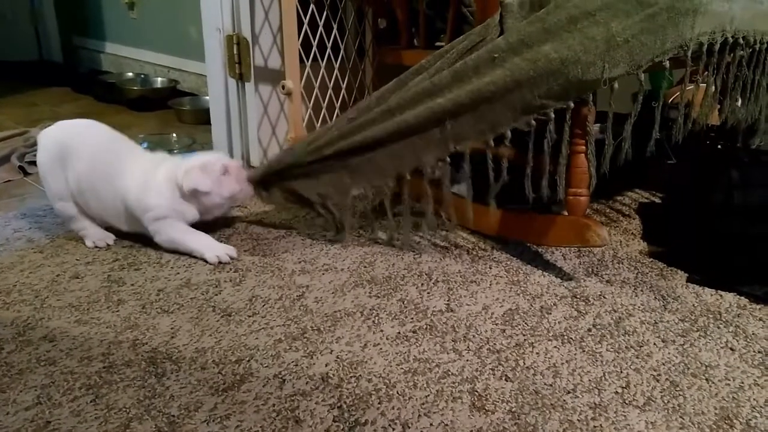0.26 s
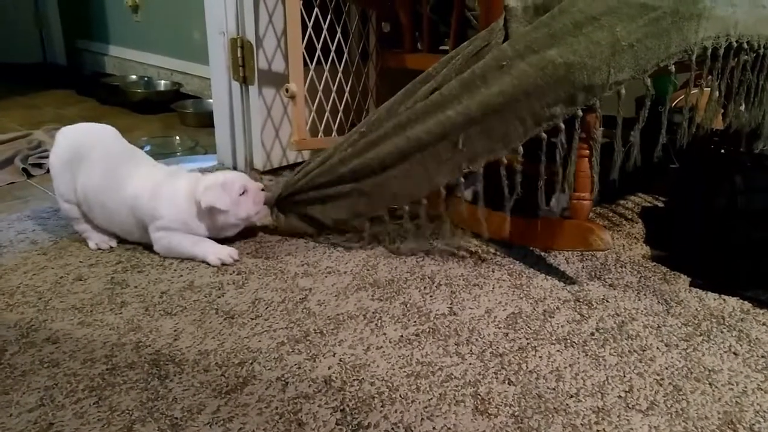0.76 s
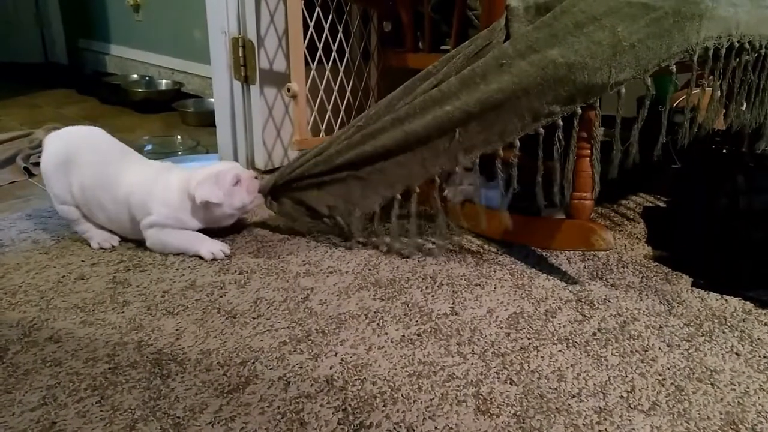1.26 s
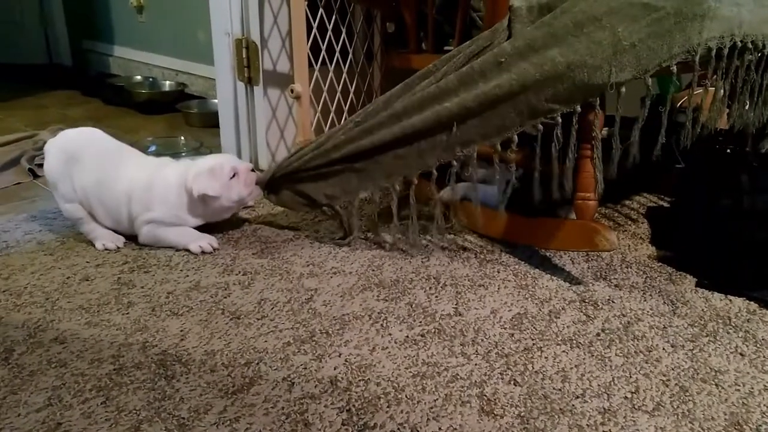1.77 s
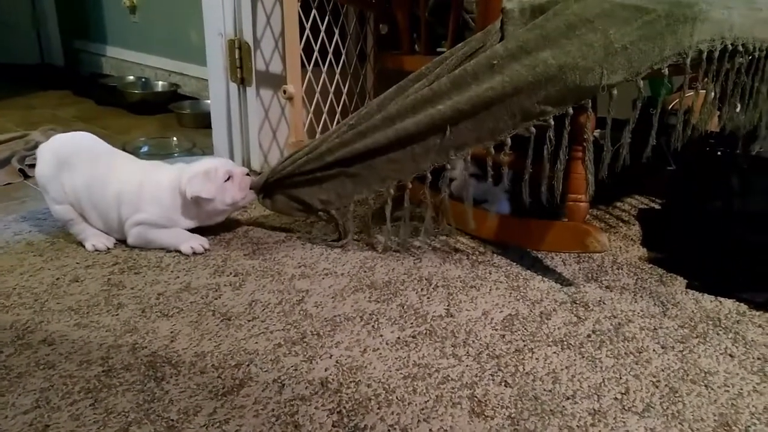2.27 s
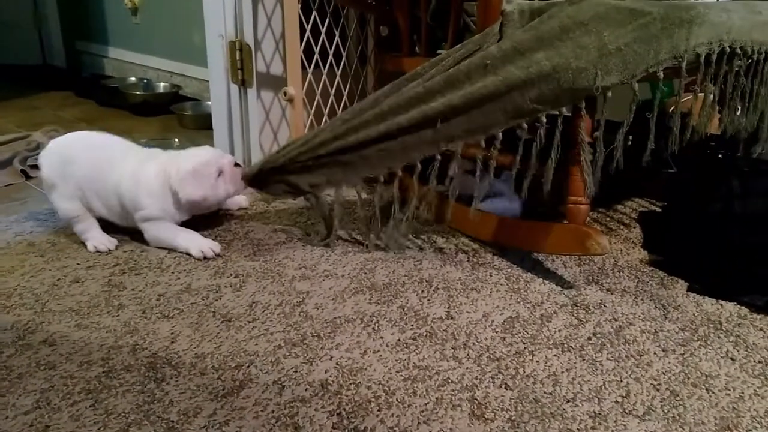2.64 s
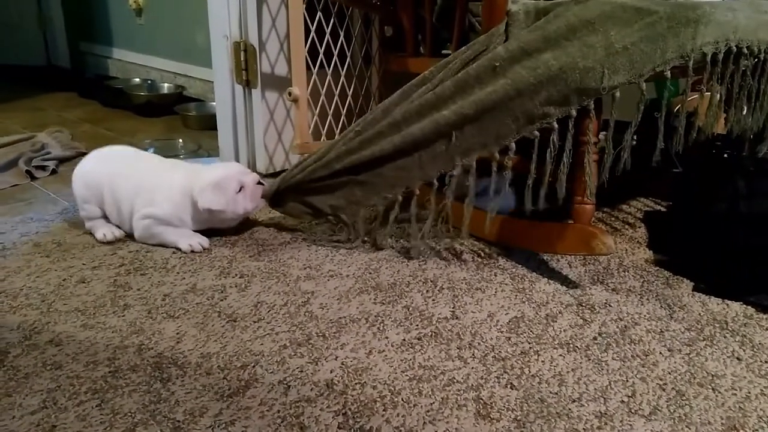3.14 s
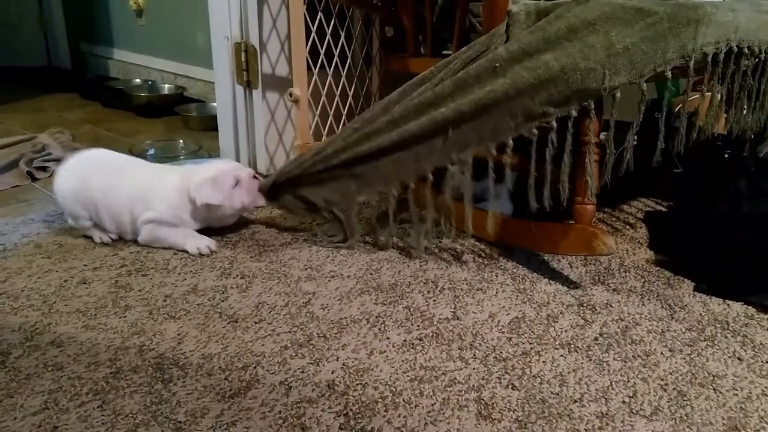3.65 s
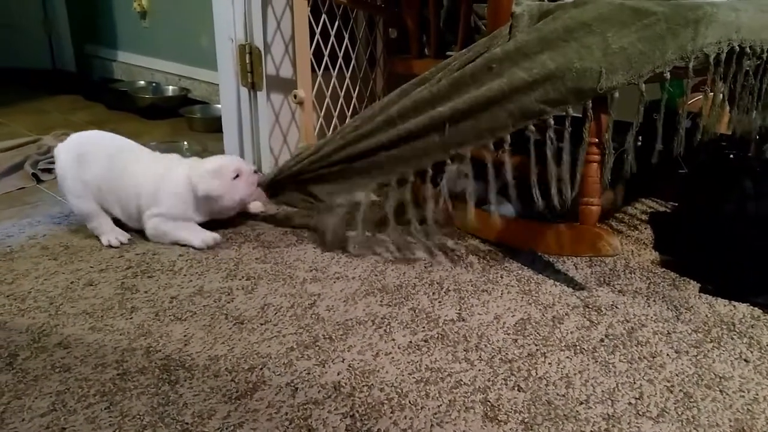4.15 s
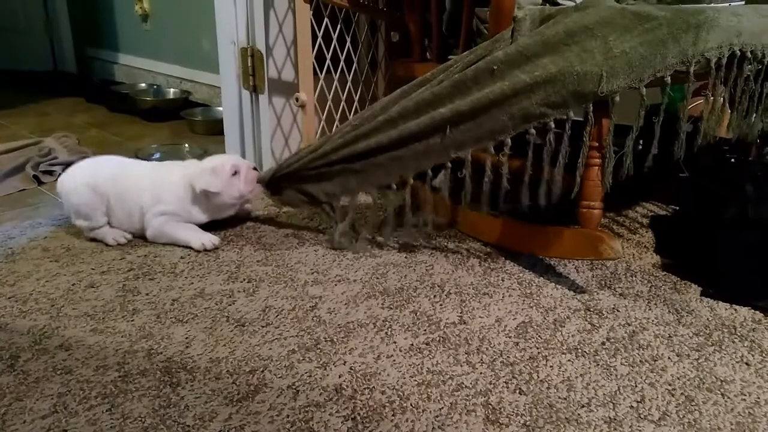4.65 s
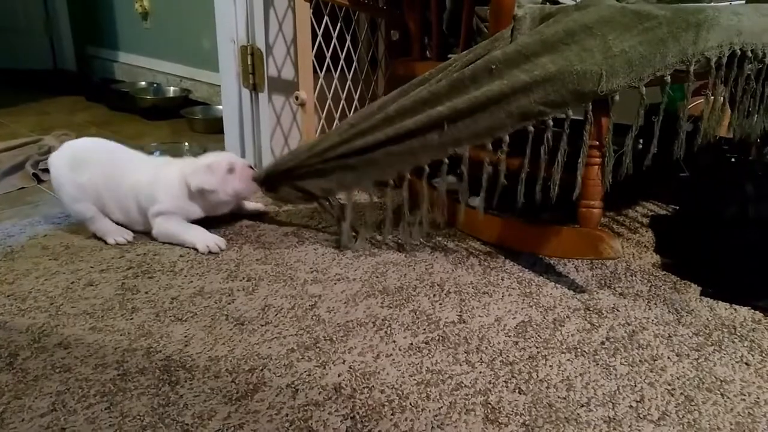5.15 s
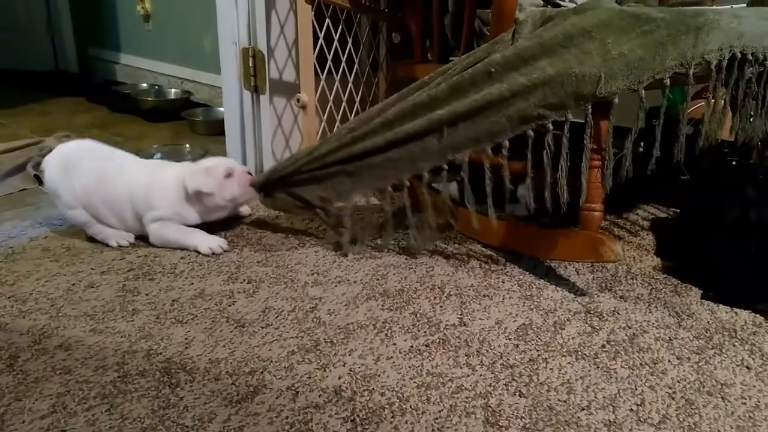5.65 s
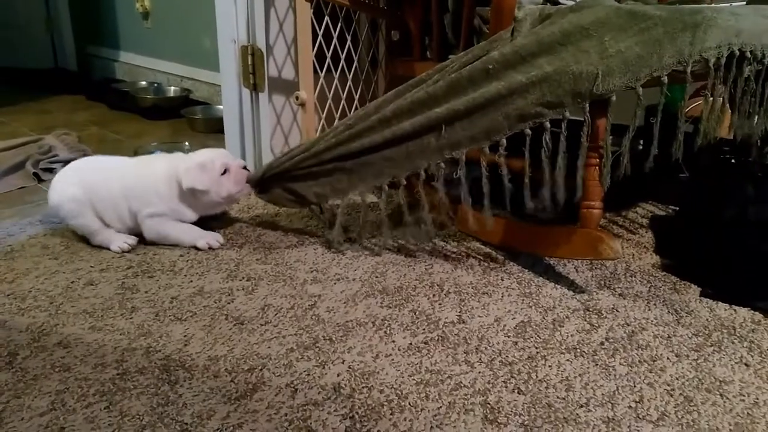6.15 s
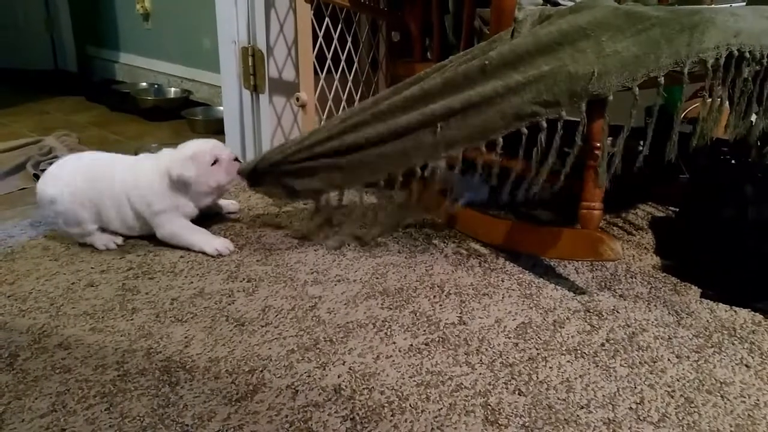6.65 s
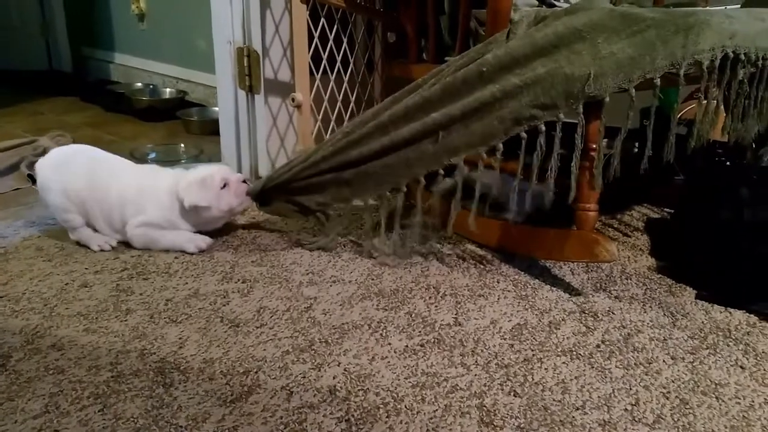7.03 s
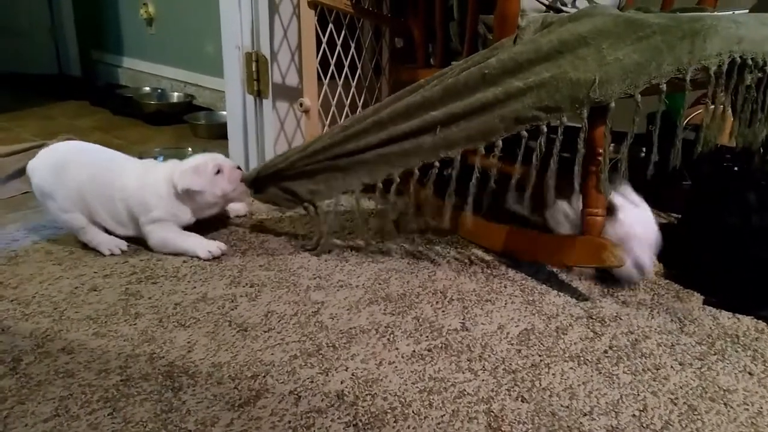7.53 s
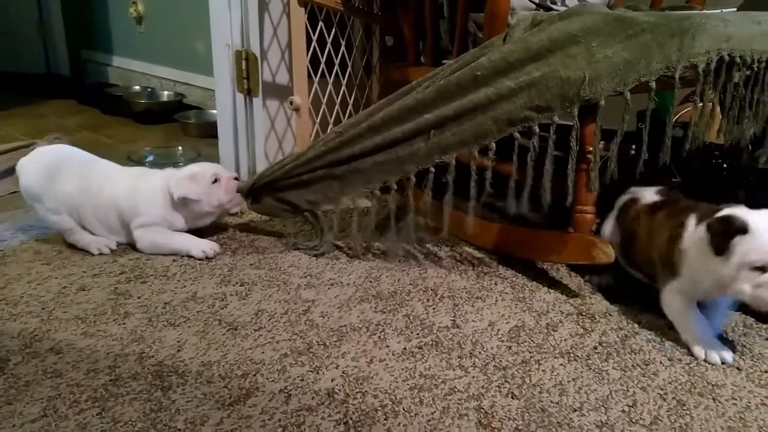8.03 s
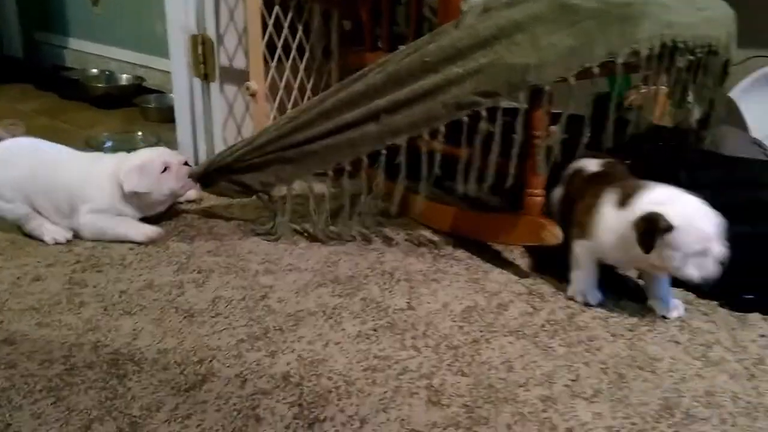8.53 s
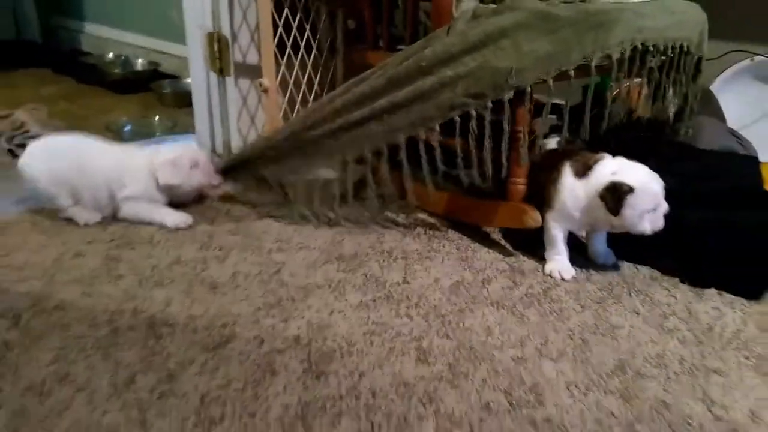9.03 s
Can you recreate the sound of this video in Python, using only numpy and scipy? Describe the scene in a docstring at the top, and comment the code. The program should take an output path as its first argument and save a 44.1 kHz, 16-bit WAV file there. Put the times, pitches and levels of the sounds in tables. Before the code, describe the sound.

A quiet carpeted home room with soft air noise and a faint wavering appliance hum. At once a puppy gives a short rattling growl, then from 0.8 to 1.8 s a longer one that swells into a low moaning note, with a tick and thump near 1.7. From 2 to 3 s it strains harder, voice rising, as the blanket snaps taut repeatedly, squeaks briefly and paws thud. Another grumble comes at 3 to 3.5, then at about 4.2 the growl opens into a hoarse, raspy snarl, sinking into small grunts. Rough growls follow near 4.8, 5.2 and 5.8, with carpet drag around 6.4. The loudest snarl bursts at 6.8, with fizzing threads and a tiny squeak. A growl at 7.4 leads to a heavy floor thud near 7.7, and a cloth swish at 8. Short growls at 8.3 and 9.1 finish, close and lightly reverberant.

```python
"""A puppy growls in bursts, tugging at a blanket draped over a rocking chair in a carpeted room; an appliance hums.
At first come two growls, the second with a low sung note; throat flaps at 22 to 35 a second chop a ragged buzz.
From about two seconds the cloth snaps and squeaks (noise bursts and gliding tones) and paws thud on the floor.
Near 4.2 and 6.8 seconds the growl opens into a snarl of pulses through resonances, then a heavy thud follows.
Cloth rustles and carpet scuffs (coloured noise) run throughout, and two short growls end the scene."""
import sys
import numpy as np
from scipy import signal
from scipy.fft import rfft, irfft, next_fast_len
from scipy.io import wavfile
from scipy.ndimage import uniform_filter1d

SR = 44100
rng = np.random.default_rng(int(sys.argv[2]) if len(sys.argv) > 2 else 0)


def wrap_up_sound(samples):
    """Save the sound to the file named by the first command line argument, as 16-bit audio."""
    columns = np.atleast_2d(samples).T
    # keep every value between -1 and 1, then stretch to whole-number steps
    tamed = np.clip(columns, -1, 1)
    steps = np.round(tamed * 32767).astype(np.int16)
    wavfile.write(sys.argv[1], SR, steps)


N = 410130
TIME = np.arange(N) / SR  # seconds

# Room air spectrum. Each row: frequency in Hz, relative density in dB.
AIR_SPECTRUM = [(25, -65), (55, -2), (250, -4), (520, -9), (900, -22), (1600, -52), (2500, -85),
                (3500, -53), (6500, -37), (15500, -37.5)]
AIR_DB = -48
# Appliance hum and hiss. Each row: frequency in Hz, width in Hz, level in dB.
HUM_BANDS = [(190.1, 9, -55), (385.5, 7.7, -58.5), (1008, 8.5, -59), (8730, 240, -73)]
ROOM_T60_S = 0.19

# Paws and rump land on the floor. Each row: start in seconds, peak in dB before filtering.
THUDS = [(1.674, -22), (2.02, -33), (2.728, -35), (3.033, -37.5), (3.768, -36.5), (3.814, -36),
         (4.463, -30.5), (4.55, -36.5), (7.208, -33.5), (7.281, -29.5), (7.659, -18.5), (7.938, -32.5)]
# Floor resonances. Each row: frequency in Hz, width in Hz, relative level in dB.
FLOOR_MODES = [(64, 8.8, -7.5), (86.5, 7.8, 5.5), (129, 25, 3), (162, 40, 3.5)]

# Carpet scuff spectrum. Each row: frequency in Hz, relative density in dB.
CARPET_SPECTRUM = [(130, -28), (200, -8), (750, -5), (1400, -9), (2400, -15), (4500, -26.5)]
# Bodies drag on the carpet. Each row: crest in seconds, rise in seconds, fall in seconds, level in dB.
DRAGS = [(3.7, 0.24, 0.52, -49), (6.45, 0.12, 0.41, -44.5), (7.8, 0.99, 0.5, -52)]
SHUFFLE_DB = -53  # paws shuffling between drags

# Cloth rustle spectrum. Each row: frequency in Hz, relative density in dB.
CLOTH_SPECTRUM = [(1500, -30), (2600, 11), (3300, 4), (5400, 6.5), (6800, -2.5), (8300, 3.5), (14700, 2),
                  (16000, -5)]
# Loose cloth and fringe swish. Each row: crest in seconds, rise in seconds, fall in seconds, level in dB.
SWISHES = [(1.97, 0.02, 0.03, -57), (6.52, 0.018, 0.045, -52), (6.9, 0.1, 0.22, -60),
           (8.02, 0.013, 0.014, -50.5)]
RUSTLE_DB = -65.5  # the taut cloth between swishes
PULL_DB, TIRING_DB_PER_S = -14.5, 0.38  # strained cloth against the mouth's level; the pull slackens with time
# Threads slip through the teeth with a fine fizz.
# Each row: crest in seconds, rise in seconds, fall in seconds, level in dB.
SLIPS = [(2.52, 0.073, 0.05, -52), (6.97, 0.098, 0.1, -44.5), (8.67, 0.067, 0.1, -57)]
FIZZ_HZ, FIZZ_WIDTH_HZ = 14600, 1900  # width of each of two resonances in a row

# Threads and claws tick. Each row: start in seconds, peak in dB.
TICKS = [(1.6673, -31), (2.6803, -28)]
# Tick resonances. Each row: frequency in Hz, width in Hz, relative level in dB.
TICK_MODES = [(3260, 820, 13.5), (11700, 6500, 2)]
# The blanket jerks taut. Each row: start in seconds, peak in dB, decay by 60 dB in seconds.
JERKS = [(1.975, -28, 0.084), (2.137, -27.5, 0.062), (2.457, -22, 0.23), (2.679, -23, 0.18),
         (2.72, -23.5, 0.13), (2.912, -33.5, 0.071), (3.679, -28, 0.051), (3.843, -34, 0.03),
         (7.772, -25, 0.04)]
# Resonances of the jerked cloth. Each row: frequency in Hz, width in Hz, relative level in dB.
JERK_MODES = [(323, 280, 14.5), (1180, 200, 18.5), (1800, 400, 9.5), (3580, 4100, -6.5)]
# Cloth squeaks in stick-slip tones. Each row: crest in seconds, rise in seconds, fall in seconds,
# frequency at the crest in Hz, glide in Hz per second, peak in dB.
SQUEAKS = [(2.686, 0.0094, 0.013, 1850, -2000, -35.5), (6.975, 0.0035, 0.0046, 4030, -45000, -34)]
SQUEAK_WAVER = 0.012  # share of pitch

# The steady grumble under each growl. Each row: start in seconds, length in seconds, first flaps per second,
# last flaps per second, throat level in dB, mouth level in dB.
GROWLS = [(0.019, 0.29, 29.6, 26.8, -38.5, -51), (0.785, 0.98, 27.3, 34, -43.5, -53),
          (1.903, 0.73, 27.6, 23.8, -46, -51), (3.016, 0.5, 29.4, 21.7, -41, -47),
          (3.91, 0.71, 32.9, 31, -39, -40), (4.713, 0.49, 28.3, 24.2, -41, -49.5),
          (5.622, 0.47, 26.2, 28.2, -44.5, -47), (6.68, 0.53, 34.5, 32.5, -38.5, -46.5),
          (7.381, 0.43, 31, 22.7, -41, -50), (8.301, .28, 33, 24.3, -42, -44),
          (9.066, .24, 22, 33, -41.5, -44)]
ATTACK_S, RELEASE_S = 0.02, 0.1
# Each heave on the blanket swells the growl and opens the mouth. Each row: crest in seconds,
# rise in seconds, fall in seconds, throat level in dB, mouth level in dB.
HEAVES = [(.225, 0.02, 0.12, -35.5, -39), (1.33, 0.061, 0.098, -36.5, -39), (1.67, 0.2, 0.058, -48, -43),
          (2.471, 0.1, 0.097, -36, -35.5), (2.465, 0.0071, 0.017, -31.5, -32),
          (3.28, 0.13, 0.32, -35.5, -41), (4.07, 0.017, 0.048, -31, -47), (4.205, 0.05, 0.12, -40.5, -33.5),
          (4.77, 0.071, 0.072, -38.5, -41.5), (5.2, 0.033, 0.063, -36.5, -32.5),
          (5.71, 0.016, 0.054, -34.5, -44), (5.87, 0.064, 0.088, -33.5, -37.5),
          (6.81, 0.057, 0.15, -34, -29), (7.121, 0.014, 0.017, -38, -37.5), (7.45, .04, 0.13, -38, -37),
          (8.335, 0.017, 0.063, -32.5, -30), (9.1, 0.02, 0.05, -33.5, -35.5)]
TREMBLE_DB, TREMBLE_PER_S = 1.1, 18  # the effort is never quite steady
FLAP_JITTER_S, FLAP_SPREAD_DB, FLAP_CLOSE_S = 0.0022, 3, 0.012

# Low sung notes and grunts, each an arch in pitch. Each row: start in seconds, rise in seconds,
# fall in seconds, top pitch in Hz, share of pitch lost at the ends, level in dB.
NOTES = [(1.25, 0.12, .37, 242.1, .2, -38.5), (2.018, .006, 0.034, 471, 0.55, -38.5),
         (2.28, 0.13, 0.18, 232, 0.15, -35), (3.17, 0.2, .17, 234.2, .11, -37.5),
         (4.31, 0.0084, .05, 289.7, 0.29, -45), (4.41, 0.079, .035, 235.4, 0.21, -38),
         (4.515, 0.02, 0.03, 335, 0.15, -43), (4.597, .012, .03, 244, .15, -37.5),
         (6.905, 0.0492, .075, 214.8, .12, -35)]
FOLD_HZ, FOLD_JITTER = 198.0, 0.13  # resting pitch of the vocal folds; jitter as a share
NOTE_FADE_S, NOTE_JITTER, NOTE_FLICKER_DB = 0.02, 0.08, 4
NOTE_HARMONICS_DB = (0, -14, -14)

# Air wheezes through narrow gaps at the lips. Each row: crest in seconds, rise in seconds,
# fall in seconds, frequency in Hz, level in dB.
WHEEZES = [(.3, .025, .025, 3060, -48.5), (.27, 0.031, .04, 5400, -51.5), (2.52, 0.038, 0.046, 3130, -51),
           (3.97, 0.032, 0.086, 3370, -47.5), (4.141, .005, 0.037, 4400, -44),
           (5.811, 0.065, 0.097, 3160, -51), (6.875, 0.03, .035, 5630, -47.5),
           (8.39, 0.041, .11, 3250, -51.5), (9.135, 0.027, .04, 5900, -56.5)]
WHEEZE_WIDTH_HZ = 480  # of each of two resonances in a row

# The voice locks into a snarl. Each row: crest in seconds, rise in seconds, fall in seconds,
# top pitch in Hz, pitch jitter as a share, level in dB.
SNARLS = [(4.205, .036, .08, 410, .1, -24.5), (6.818, .045, 0.045, 429.4, 0.03027, -20)]
# Snarl resonances at full strain. Each row: frequency in Hz, width in Hz, relative level in dB.
SNARL_TRACT = [(442, 90, 3.5), (789, 36, 11), (1310, 130, -1), (1760, 242, 4), (2070, 270, 1)]
SNARL_SAG, SNARL_BREATH = 0.15, 0.45  # share of pitch lost away from the crest; breath noise against the cry
SNARL_FLUTTER = 1.7  # power to which the flow chops the cry

# Chest resonance at the resting pitch. Each row: frequency in Hz, width in Hz, relative level in dB.
CHEST = [(181, 187, 0)]
# Throat resonances at an ordinary effort. Each row: frequency in Hz, width in Hz, relative level in dB.
THROAT = [(323.5, 32.5, -2), (544, 43, -2), (688.5, 103, 1), (832, 118, -0.5)]
# Mouth resonances at an ordinary effort. Each row: frequency in Hz, width in Hz, relative level in dB.
MOUTH = [(990, 390, -1), (1400, 397, 2), (1684, 70, 4.5), (1855, 360, -5.5)]
# Teeth resonances at an ordinary effort. Each row: frequency in Hz, width in Hz, relative level in dB.
TEETH = [(3290, 180, 5.1), (3480, 94, 6.7), (4305, 720, 5)]
# Air rasps past the bared teeth. Each row: crest in seconds, rise in seconds, fall in seconds, level in dB.
RASPS = [(1.15, 0.043, 0.0099, -61), (4.265, 0.06, 0.047, -34), (4.5, .03, 0.11, -56),
         (6.766, 0.0061, 0.053, -26), (7.16, 0.028, 0.03, -49), (7.5, .05, 0.053, -53.5)]
ORDINARY_DB = -37  # level of throat or mouth at an ordinary effort
CHEST_DB, CHEST_FOLLOWS = -42, 0.64  # at an ordinary effort; share of the throat's swing
TEETH_DB, TEETH_FOLLOWS = -66, 3.1  # likewise, for the swing of the mouth
BREATH_SHARE, SLAP_SHARE, CHEST_SLAP_SHARE = 0.45, 0.17, 0.4
JAW_LIFT_PER_DB, JAW_RANGE_DB = 0.005, 12  # share by which resonances rise as the mouth opens, and its limit
JAW_WANDER, JAW_WANDER_PER_S = 0.042, 14
COLOUR_DB, COLOUR_PER_S = 2.8, 33  # wander in the strength of each resonance

PORT_HZ, PORT_LAG_S = 1155, 0.000397  # above this pitch the right port lags
CUTOFF_HZ = 15500


def from_db(db):
    """Decibels to gain."""
    return np.exp(np.asarray(db) * (np.log(10) / 20))


def to_db(gain):
    """Gain to decibels."""
    return 20 * np.log10(gain + 1e-9)


def rms_one(x):
    """Scale to rms 1."""
    return x / np.sqrt(np.mean(x ** 2) + 1e-20)


def cut(x, hz, kind, order=2):
    """Butterworth low- or high-pass."""
    sos = signal.butter(order, np.minimum(hz, SR / 2 - 100), kind, fs=SR, output="sos")
    return signal.sosfilt(sos, x)


def drift(rate):
    """Slow chance: normal draws, this many a second, joined by straight lines."""
    return np.interp(TIME * rate, np.arange(4000), rng.standard_normal(4000))


def resonate(x, hz, width):
    """A two-pole resonance with gain 1 on top."""
    r = np.exp(-np.pi * width / SR)
    feedback = [1, -2 * r * np.cos(2 * np.pi * hz / SR), r * r]
    return signal.lfilter(np.array([1, 0, -1]) * (1 - r * r) / 2, feedback, x + 1e-18)


def resonate_twice(x, hz, width):
    """Two equal resonances in a row, for steeper skirts; rms 1."""
    return rms_one(resonate(resonate(x, hz, width), hz, width))


def body(x, modes):
    """Resonances in parallel, with alternating signs."""
    return sum((-1) ** k * from_db(db) * resonate(x, hz, width) for k, (hz, width, db) in enumerate(modes))


def steady(x):
    """Hold the power steady over a few flaps, leaving the flaps themselves."""
    power = uniform_filter1d(uniform_filter1d(x * x, size=1700), size=1700)
    return x / np.sqrt(np.maximum(power, 0) + 1e-6 * np.mean(x * x))


def coloured(x, spectrum):
    """Give x a spectrum; rms 1."""
    hz, db = np.transpose(spectrum)
    bins = np.maximum(np.arange(N // 2 + 1) * SR / N, 1)
    shape_db = np.interp(np.log(bins), np.log(hz), db, left=-120, right=-120)
    return rms_one(irfft(rfft(x) * from_db(shape_db), N))


def stereo_noise(side_db):
    """White noise, partly shared by the two channels."""
    mid, side = rng.standard_normal((2, N))
    return mid + from_db(side_db) * side * [[1], [-1]]


def from_crest(crest, rise, fall):
    """Time from a crest: -1 one rise before it, 1 one fall after it."""
    return (TIME - crest) / np.where(TIME < crest, max(rise, 1e-3), max(fall, 1e-3))


def swell(crest, rise, fall):
    """A lopsided bell of height 1."""
    return np.exp(-0.5 * np.minimum(from_crest(crest, rise, fall) ** 2, 100))


def swells(rows):
    """The joint gain of swells, their powers added."""
    return np.sqrt(sum((from_db(db) * swell(crest, rise, fall)) ** 2 for crest, rise, fall, db in rows))


def held(start, length, attack, release):
    """Attack, hold, release."""
    fade_in = np.clip((TIME - start) / attack, 0, 1)
    return fade_in * np.clip(1 - (TIME - start - length) / release, 0, 1) ** 2


def blows(rows, modes):
    """Each blow is a dying burst of noise into the modes, scaled to its peak."""
    out, age = np.zeros(N + SR), np.arange(SR // 2) / SR
    for start, db, t60 in rows:
        burst = rng.standard_normal(len(age)) * from_db(-60 * age / max(t60, 0.002))
        hit = body(burst, modes)
        at = max(int(start * SR), 0)
        out[at:at + len(age)] += from_db(db) * hit / np.abs(hit).max()
    return out[:N]


def background():
    """Room air as coloured noise, with the wavering hum and thin hiss of an appliance as narrow noise bands."""
    hum = sum(from_db(db) * resonate_twice(rng.standard_normal(N), hz, width) for hz, width, db in HUM_BANDS)
    return hum + from_db(AIR_DB) * coloured(stereo_noise(side_db=2.5), AIR_SPECTRUM)


def room(x, count=10):
    """Each side hears dying echo trains of its own, scattered by allpasses and dulled by the carpet."""
    size = next_fast_len(N + SR // 2)
    sides = []
    for lags in rng.uniform(0.006, 0.034, (2, count)):
        echoes = np.zeros(SR // 2)
        for k, lag in enumerate(lags):
            at = np.arange(lag, 0.5, lag)
            echoes[(at * (SR - 1)).astype(int)] += (-1) ** k * from_db(-60 * at / ROOM_T60_S)
        for lag in (53, 131, 211):  # allpass delays in samples
            taps = np.r_[0.6, np.zeros(lag), 1]
            echoes = signal.lfilter(taps, taps[::-1], echoes)
        response = rfft(echoes / np.linalg.norm(echoes), size)
        sides.append(irfft(rfft(x, size) * response, size)[:N])
    return cut(np.array(sides), 15000, "low", order=1)


def placed(x, bass_pan_db, treble_pan_db):
    """Bass and treble lean to different sides; positive leans left."""
    bass, sides = cut(x, 700, "low", order=1), np.array([[0.5], [-0.5]])
    return bass * from_db(bass_pan_db * sides) + (x - bass) * from_db(treble_pan_db * sides)


def floor_thuds():
    """Short noise bursts ring the low resonances of the floor."""
    thuds = blows([(start, db, 0.06) for start, db in THUDS], FLOOR_MODES)
    return cut(cut(thuds, 390, "low"), 41, "high")


def rubbing(mouth_gain):
    """Cloth fibres catch and let go in fine grains, more so with an open mouth; the carpet scuffs duller."""
    pull_db = np.minimum(to_db(mouth_gain), -33.5) + PULL_DB - TIRING_DB_PER_S * TIME
    pull = uniform_filter1d(from_db(pull_db), size=1500)
    grains = stereo_noise(side_db=-17.5) * from_db(2.3 * drift(700) + 3.7 * drift(35))
    cloth = (from_db(RUSTLE_DB) + swells(SWISHES) + pull) * coloured(grains, CLOTH_SPECTRUM)
    fizz = swells(SLIPS) * resonate_twice(grains, FIZZ_HZ, FIZZ_WIDTH_HZ)
    carpet = coloured(stereo_noise(side_db=-18), CARPET_SPECTRUM)
    return cloth + fizz + np.hypot(from_db(SHUFFLE_DB), swells(DRAGS)) * carpet


def ticks():
    """Threads and claws tick: very short noise bursts through bright resonances."""
    return blows([(start, db, 0.03) for start, db in TICKS], TICK_MODES)


def blanket_jerks():
    """The blanket snaps taut: noise bursts ring broad cloth resonances."""
    return blows(JERKS, JERK_MODES)


def squeaks():
    """Stretched cloth sticks and slips in wavering, gliding tones."""
    out, waver = 0, 1 + SQUEAK_WAVER * drift(200)
    for crest, rise, fall, hz, glide, db in SQUEAKS:
        pitch = (hz + glide * (TIME - crest)) * waver
        tone = np.sin(2 * np.pi * np.cumsum(pitch) / SR)
        out = out + from_db(db) * swell(crest, rise, fall) * tone
    return out


def effort():
    """Gains of throat and mouth: each growl holds a steady grumble, and the heaves swell it."""
    gate, throat, mouth = np.zeros((3, N))
    for start, length, _, _, throat_db, mouth_db in GROWLS:
        on = held(start - ATTACK_S / 2, length, ATTACK_S, RELEASE_S)
        gate = gate + on
        throat = throat + on * from_db(throat_db)
        mouth = mouth + on * from_db(mouth_db)
    for crest, rise, fall, throat_db, mouth_db in HEAVES:
        heave = gate * swell(crest, rise, fall)
        throat = np.hypot(throat, heave * from_db(throat_db))
        mouth = np.hypot(mouth, heave * from_db(mouth_db))
    tremble = from_db(TREMBLE_DB * drift(TREMBLE_PER_S))
    return throat * tremble, mouth * tremble


def flaps(mouth_db):
    """Loose throat tissue slaps open: the slaps, and the air flow, which closes less fully as the mouth opens."""
    slaps = np.zeros(N)
    for start, length, first_per_s, last_per_s, _, _ in GROWLS:
        age = TIME[:int((length + RELEASE_S) * SR)]
        count = np.cumsum(np.interp(age, [0, length], [first_per_s, last_per_s])) / SR
        times = start + np.interp(np.arange(count[-1]), count, age)
        chance = rng.standard_normal((64, 2))[:len(times)]
        times = times + FLAP_JITTER_S * chance[:, 0]
        slaps[np.clip((times * SR).astype(int), 0, N - 1)] = from_db(FLAP_SPREAD_DB * chance[:, 1])
    puffs = signal.lfilter([1], [1, -np.exp(-1 / (FLAP_CLOSE_S * SR))], slaps + 1e-18)
    leak = np.interp(mouth_db, [-49.5, -39.5, -29.5], [0.27, 0.6, 0.7])
    flow = cut(leak + (1 - leak) * puffs, 250, "low")
    return slaps * (1 - leak) ** 2, flow


def folds():
    """Gain of the sung notes, and the pitch of the vocal folds, which arches away from rest on each note."""
    gain, pitch = np.zeros(N), np.full(N, FOLD_HZ)
    for start, rise, fall, top_hz, sag, db in NOTES:
        on = held(start, rise + fall, NOTE_FADE_S, NOTE_FADE_S)
        arch = top_hz * (1 - sag * np.minimum(from_crest(start + rise, rise, fall) ** 2, 1))
        gain = gain + on * from_db(db)
        pitch = pitch + np.sqrt(on) * (arch - pitch)
    return gain, pitch


def rough_pulses(hz, jitter, spread_db):
    """One click a cycle, uneven in time and strength; also the phase in cycles."""
    turns = np.cumsum(hz * (1 + jitter * drift(150))) / SR
    clicks = np.diff(np.floor(turns), prepend=0)
    return clicks * from_db(spread_db * drift(300)), turns


def tract(x, modes, stretch):
    """Parallel resonances that slide together with the stretch, each wandering in strength."""
    out, clock = 0, np.cumsum(stretch) / SR
    for k, (hz, width, db) in enumerate(modes):
        turn, r = np.exp(2j * np.pi * hz * clock), np.exp(-np.pi * width / SR)
        gain = (-1) ** k * from_db(db + COLOUR_DB * drift(COLOUR_PER_S))
        # shift the mode down to 0 Hz, smooth it, shift it back
        ringing = turn * signal.lfilter([1 - r], [1, -r], x * turn.conj())
        out = out + gain * np.real(ringing)
    return out


def wheezes(flow):
    """Each flap puffs air through a narrow gap that rings at one pitch."""
    air = steady(flow ** 4 * rng.standard_normal(N))
    return sum(from_db(db) * swell(crest, rise, fall) * resonate_twice(air, hz, WHEEZE_WIDTH_HZ)
               for crest, rise, fall, hz, db in WHEEZES)


def low_note(pitch, flow):
    """The vocal folds sing a wavering note under the flaps."""
    _, turns = rough_pulses(pitch * (1 + 0.035 * drift(30)), jitter=NOTE_JITTER, spread_db=0)
    tone = sum(from_db(db) * np.sin(2 * np.pi * k * turns) for k, db in enumerate(NOTE_HARMONICS_DB, 1))
    return steady(tone * np.sqrt(np.abs(flow)) * from_db(NOTE_FLICKER_DB * drift(70)))


def snarl(flow, wander):
    """At full strain the folds lock into a hoarse cry whose pitch and resonances rise and sink with the strain."""
    crests, _, _, tops, jitters, _ = np.transpose(SNARLS)
    gain = swells([(crest, rise, fall, db) for crest, rise, fall, _, _, db in SNARLS])
    height = sum(swell(crest, rise, fall) for crest, rise, fall, *_ in SNARLS)
    strain = 1 - SNARL_SAG * (1 - height)
    pitch = np.interp(TIME, crests, tops) * strain
    cry, _ = rough_pulses(pitch, jitter=np.interp(TIME, crests, jitters), spread_db=2.5)
    hoarse = rms_one(cry) + SNARL_BREATH * rng.standard_normal(N)
    drive = hoarse * np.abs(flow) ** SNARL_FLUTTER
    voice = tract(drive, SNARL_TRACT, np.sqrt(strain) * wander)
    return gain * steady(cut(cut(voice, 2230, "low", order=14), 280, "high"))


def growl(throat_gain, mouth_gain):
    """Flaps chop a ragged buzz that rings in chest, throat, mouth and teeth; an opening jaw lifts the resonances."""
    slaps, flow = flaps(to_db(mouth_gain))
    note_gain, pitch = folds()
    buzz, _ = rough_pulses(pitch, jitter=FOLD_JITTER, spread_db=2.5)
    ragged = rms_one(buzz) + BREATH_SHARE * rng.standard_normal(N)
    drive = flow * ragged + SLAP_SHARE * cut(rms_one(slaps), 800, "low")
    chest_drive = drive + CHEST_SLAP_SHARE * rms_one(slaps)

    opening_db = to_db(mouth_gain) - ORDINARY_DB
    wander = 1 + JAW_WANDER * drift(JAW_WANDER_PER_S)
    stretch = wander + JAW_LIFT_PER_DB * np.clip(opening_db, -JAW_RANGE_DB, JAW_RANGE_DB)

    chest = tract(chest_drive, CHEST, pitch / FOLD_HZ)  # follows the pitch of the folds
    chest = steady(cut(cut(chest, 164, "high", order=4), 350, "low"))
    throat = tract(drive, THROAT, stretch)
    throat = steady(cut(cut(throat, 820, "low", order=4), 140, "high"))
    mouth = tract(drive, MOUTH, stretch)
    mouth = steady(cut(cut(mouth, 2135, "low", order=10), 770, "high"))
    teeth = tract(drive * flow, TEETH, np.sqrt(stretch))
    teeth = steady(cut(cut(teeth, 3100, "high", order=8), 3530, "low", order=3))

    # the chest swells gently with effort, the hiss at the teeth steeply as the lips draw back
    chest_gain = from_db(CHEST_DB + CHEST_FOLLOWS * (to_db(throat_gain) - ORDINARY_DB))
    teeth_gain = from_db(TEETH_DB + TEETH_FOLLOWS * opening_db) + swells(RASPS)
    voice = chest_gain * chest + throat_gain * throat + mouth_gain * mouth + teeth_gain * teeth
    return voice + snarl(flow, wander) + note_gain * low_note(pitch, flow) + wheezes(flow)


def scene():
    """Puppy and blanket lean left in the bass and right in the treble, thuds lean right, all in the room."""
    throat_gain, mouth_gain = effort()
    thuds = floor_thuds()
    near = growl(throat_gain, mouth_gain) + blanket_jerks() + ticks() + squeaks()
    direct = placed(near, bass_pan_db=5.5, treble_pan_db=-3.5) + thuds * from_db([[-1.5], [1.5]])
    reverb = from_db(-5.5) * room(near + thuds)
    return direct + reverb + rubbing(mouth_gain) + background()


def record(dry):
    """The two ports hear the bass alike and the treble with a lag on the right; the top is cut."""
    hz = np.fft.rfftfreq(N, 1 / SR)
    lag = np.exp(-2j * np.pi * PORT_LAG_S * np.maximum(hz - PORT_HZ, 0))
    right = irfft(rfft(dry[1]) * lag, N)
    top_cut = signal.ellip(10, 0.2, 80, CUTOFF_HZ, fs=SR, output="sos")
    return signal.sosfilt(top_cut, [dry[0], right])


dry = scene()
out = record(dry)
wrap_up_sound(out)
```